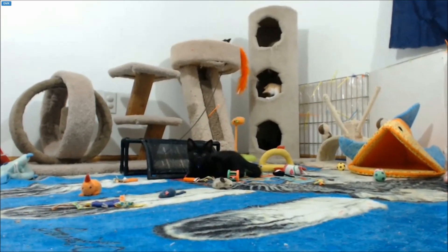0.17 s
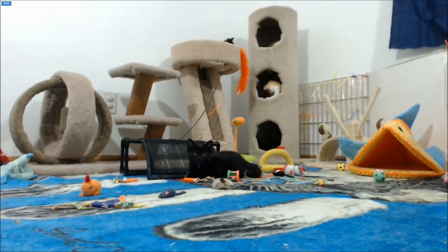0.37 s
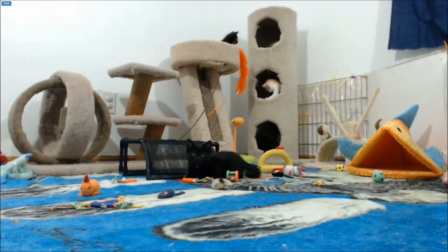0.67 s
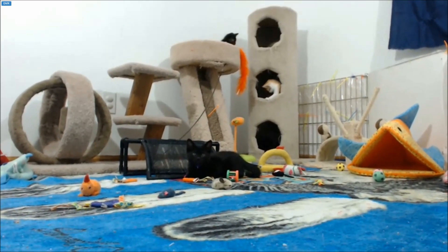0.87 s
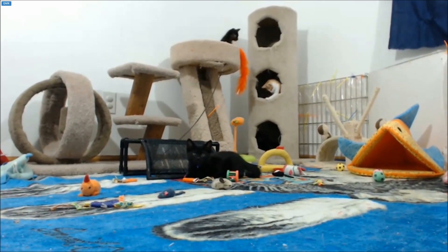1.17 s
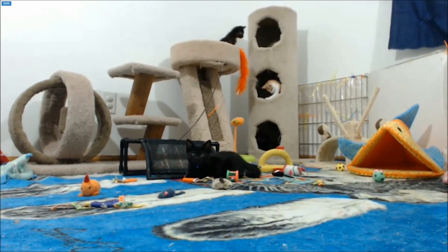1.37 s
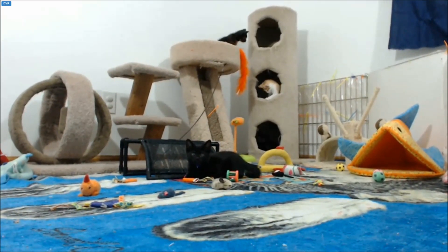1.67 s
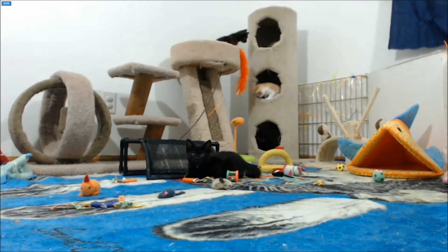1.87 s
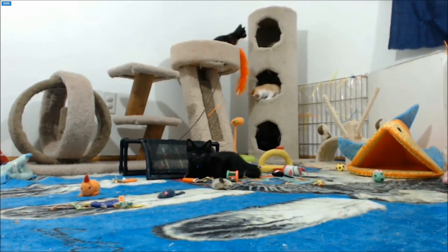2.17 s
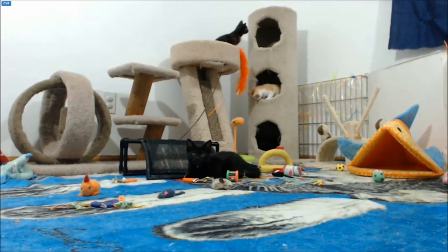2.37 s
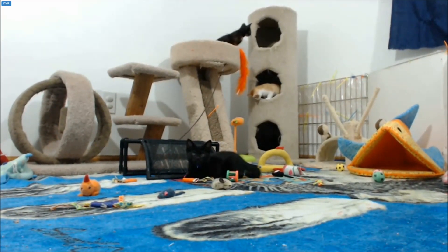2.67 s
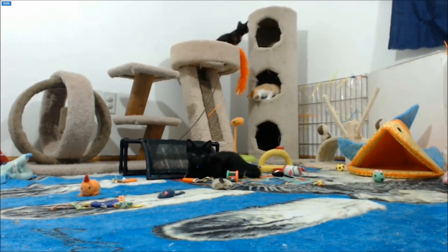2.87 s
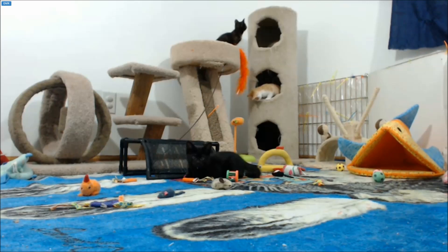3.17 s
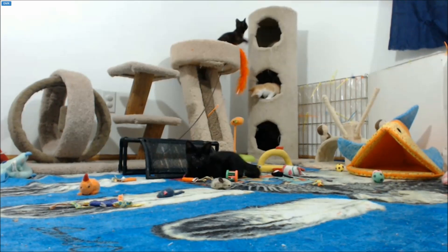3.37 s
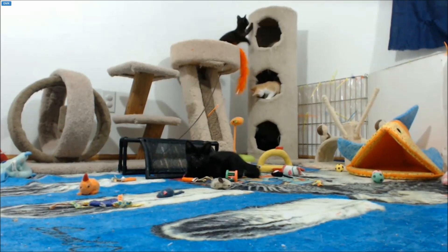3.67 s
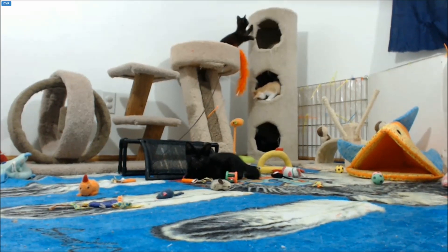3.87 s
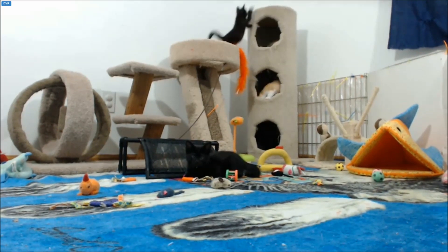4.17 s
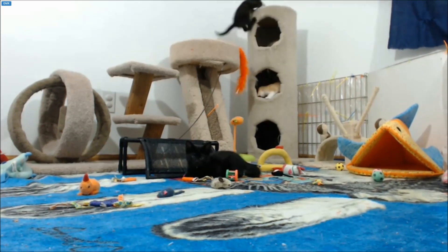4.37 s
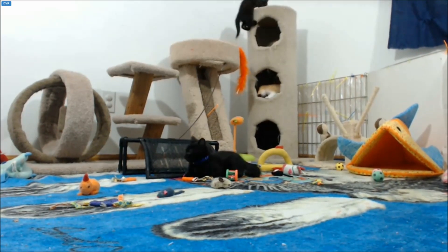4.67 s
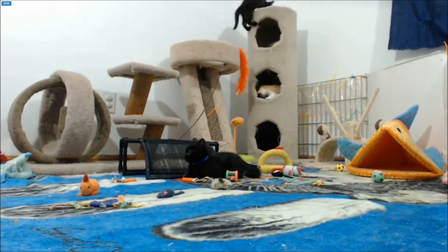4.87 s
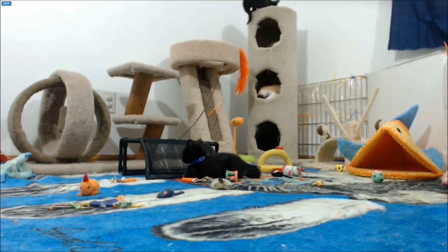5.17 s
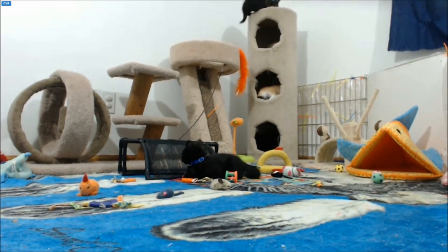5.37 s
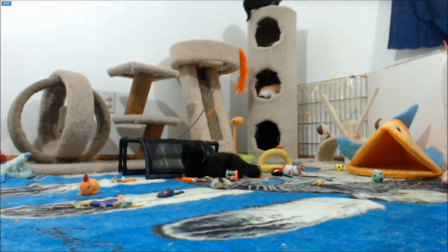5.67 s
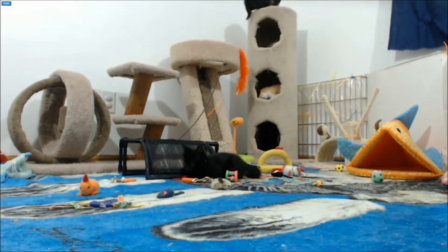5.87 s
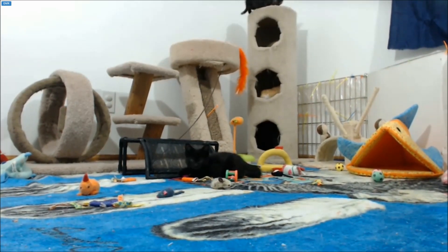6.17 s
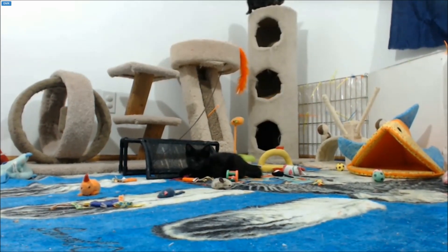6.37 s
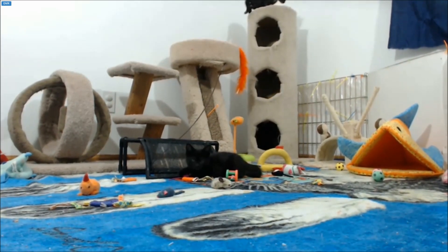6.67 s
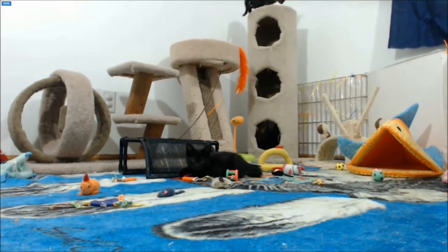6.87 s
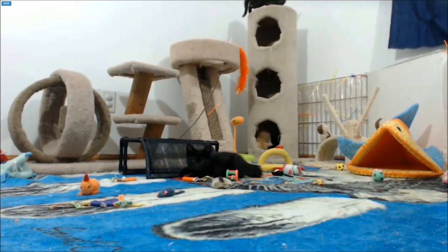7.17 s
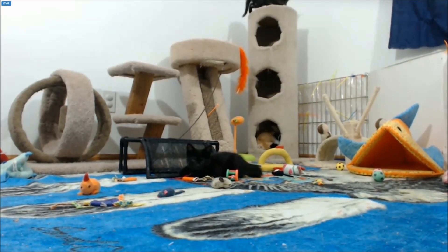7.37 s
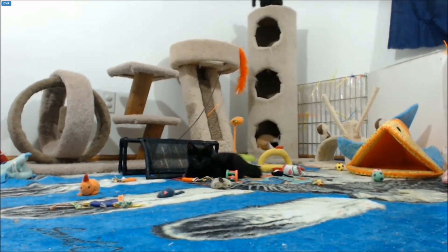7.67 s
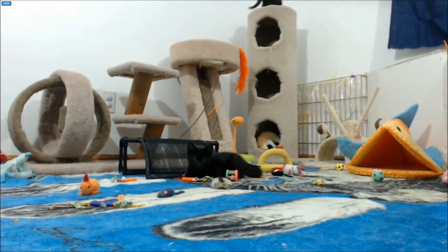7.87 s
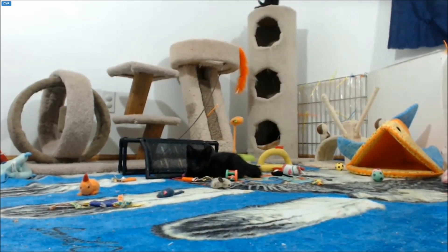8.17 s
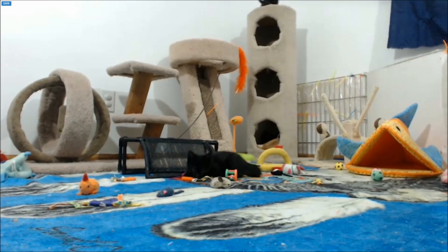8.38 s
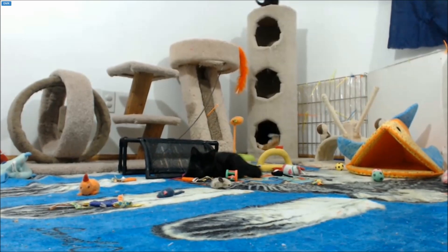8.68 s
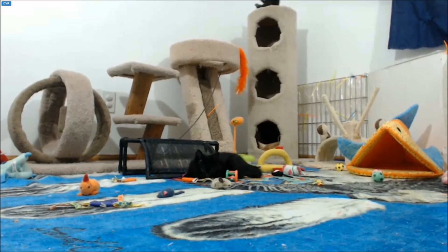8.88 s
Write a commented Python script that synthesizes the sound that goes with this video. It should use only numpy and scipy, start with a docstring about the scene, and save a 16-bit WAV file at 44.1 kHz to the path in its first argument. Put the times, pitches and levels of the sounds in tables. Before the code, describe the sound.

Small claws drag through carpet on a hollow climbing tower, beginning mid-scratch with raspy strokes and low tube resonance. Sharp snags and a brief thin slide follow, then lighter, sparser scrabbling with soft paw knocks. Scratching picks up again and grows into crisp, tearing catches and a dull thump near seven seconds, staying jerky to the end. Close stereo pickup in a small, soft, quiet room with faint air.

```python
"""Kittens' claws drag through the carpet of a hollow climbing tower and snap loose from its loops.
Bursts of noise, in strokes and sharp catches, make the pile, a board and the hollow tube ring together.
The scratching passes from the tube's inner wall to its outer wall; one claw tip slides down the inside.
Padded paws land with soft knocks made of decaying tones. A little room echo and faint, coloured
noise for the air surround it all."""
import sys
import numpy as np
from scipy import signal
from scipy.fft import rfft, irfft
from scipy.io import wavfile
from scipy.ndimage import uniform_filter1d

SR = 44100
rng = np.random.default_rng(int(sys.argv[2]) if len(sys.argv) > 2 else 0)


def inscribe(sig):
    """Save sig as 16-bit PCM at rate SR to the path in sys.argv[1].

    A 1-D sig is mono; a 2-D sig holds one channel per row.
    Samples are clipped to [-1, 1] before scaling.
    """
    pcm = np.round(np.clip(np.atleast_2d(sig).T, -1, 1) * 32767)
    wavfile.write(sys.argv[1], SR, pcm.astype(np.int16))


def convert_level_to_amplitude(level_db):
    """Map a level in decibels to its linear amplitude factor."""
    exponent = np.asarray(level_db, float) / 20
    return 10 ** exponent


N = 398223

# Claw strokes: start_s, end_s, pile_start_db, pile_end_db, weight_db (push on the tube over that on the pile)
CLAW_STROKES = [(0.0, 0.151, -47.5, -49.5, 6.5), (0.163, 0.393, -49.5, -53.5, 9.5),
                (0.474, 0.529, -81.5, -32.5, -4), (0.543, 0.584, -39, -60, -4.5),
                (0.621, 0.659, -44, -95, -32), (0.831, 0.953, -40, -70.5, 3.5),
                (0.944, 1.144, -43, -57.5, 13.5), (1.16, 1.348, -70, -77, 19.5),
                (1.596, 1.764, -48, -59.5, 6.5), (1.75, 1.885, -66, -47.5, 4),
                (1.898, 1.997, -46.5, -60, -0.5), (1.97, 2.061, -62, -75.5, 6),
                (2.326, 2.389, -81.5, -64.5, 8), (2.482, 2.517, -67, -71.5, 3.5),
                (2.618, 2.652, -77, -66.5, 9.5), (2.685, 2.769, -73.5, -68.5, 5.5),
                (3.066, 3.132, -70.5, -61, 19), (3.144, 3.205, -50.5, -81.5, 3.5),
                (3.203, 3.304, -60, -55, 6), (3.277, 3.382, -56.5, -66, -12),
                (3.388, 3.507, -50.5, -66, 10), (3.511, 3.585, -49, -69.5, 7.5),
                (3.635, 3.67, -78, -51.5, -10.5), (3.755, 3.825, -53, -95, 14.5),
                (3.812, 3.95, -74, -73.5, 1), (3.939, 3.999, -57.5, -47.5, 3),
                (4.007, 4.108, -59, -63.5, -28), (4.526, 4.595, -71.5, -52, -7),
                (4.681, 4.746, -43, -74, -7), (4.726, 4.81, -73.5, -40.5, 7),
                (4.807, 4.879, -54.5, -56, 9.5), (4.895, 4.966, -52.5, -64.5, 9),
                (5.025, 5.094, -59.5, -68, 12.5), (5.092, 5.186, -81, -44, 7.5),
                (5.199, 5.232, -49, -45.5, 7), (5.347, 5.436, -75.5, -40.5, 3.5),
                (5.443, 5.543, -53, -54.5, 3.5), (5.585, 5.657, -95.5, -94.5, 36),
                (5.799, 5.898, -59, -68, -8.5), (5.896, 5.944, -45, -62.5, -7),
                (6.261, 6.334, -44.5, -47, -44), (6.319, 6.378, -44.5, -49, -27),
                (6.38, 6.446, -61, -78, -34), (6.427, 6.512, -55.5, -50, -19.5),
                (6.496, 6.528, -46, -44.5, -26.5), (6.604, 6.644, -76, -55, -19),
                (6.645, 6.688, -42, -48, -24), (6.699, 6.811, -59, -57.5, -20),
                (6.84, 6.913, -62.5, -49, 4.5), (6.899, 6.982, -52, -41.5, -25),
                (7.028, 7.148, -49.5, -40.5, -2.5), (7.165, 7.199, -46, -52, 1), (7.202, 7.31, -61, -38, 3),
                (7.31, 7.356, -47, -94, -13.5), (7.443, 7.541, -43.5, -40.5, -7),
                (7.582, 7.677, -54.5, -43, -18.5), (7.66, 7.8, -56, -92, -9),
                (7.797, 7.912, -64, -40.5, -11.5), (7.903, 8.007, -52.5, -51, 2),
                (8, 8.091, -56.5, -47.5, -14.5), (8.023, 8.12, -80.5, -50, 6.5),
                (8.208, 8.293, -38, -53.5, -12), (8.32, 8.41, -52, -94, -4),
                (8.566, 8.647, -62, -45.5, -30), (8.645, 8.716, -40, -31, -21.5),
                (8.849, 8.878, -54.5, -62, -9), (8.949, 9.03, -79.5, -25.5, -4)]
# Tones of the hollow tube: pitch_hz, width_hz, relative_level_db
TUBE_TONES = [(123, 26, 2), (188, 45, -7), (246, 40, -2), (300, 40, 0), (385, 45, -4), (440, 50, -7)]
# Broad part of the sound of the shaken frame: pitch_hz, relative_level_db (per Hz)
FRAME_THUD = [(30, -51.5), (60, -27.5), (100, -4), (500, -5.5), (800, -21.5), (1400, -23)]


def rms_one(x):
    """Scale to unit rms, so that a later gain alone sets the level."""
    return x / np.sqrt(np.mean(x ** 2) + 1e-20)


def colour(x, points):
    """Filter with the given outline (pitch_hz, level_db); minimum phase, so it never sounds ahead of x."""
    size = 4096
    hz, db = np.transpose(points)
    log_hz = np.log(np.fft.rfftfreq(size, 1 / SR) + 1)
    log_gain = np.interp(log_hz, np.log(hz), db) * np.log(10) / 20
    # folding the cepstrum forward makes the filter minimum phase
    cepstrum = irfft(log_gain)
    cepstrum[1:size // 2] *= 2
    cepstrum[size // 2 + 1:] = 0
    response = irfft(np.exp(rfft(cepstrum)))
    return signal.fftconvolve(x, response)[:N]


def drift(rate_hz):
    """Slow random wander of unit rms: noise through two equal low-pass stages at rate_hz."""
    step = 40   # samples between points of the wander
    r = np.exp(-2 * np.pi * step * rate_hz / SR)
    noise = rng.standard_normal(N // step + 2002)
    slow = signal.lfilter([1], [1, -2 * r, r * r], noise)[2000:]   # drop the filter's run-in
    return np.interp(np.arange(N) / step, np.arange(len(slow)), rms_one(slow))


def air():
    """Faint air of the room: coloured noise whose level wanders."""
    outline = [(24, -73), (40, -22), (170, 2.5), (562, -12), (1020, -15.5), (3560, -22.5), (5500, -29.5),
               (12400, -30.5), (15500, -38)]   # pitch_hz, relative_level_db (per Hz)
    level_db = -82 + 2.5 * drift(10)
    return convert_level_to_amplitude(level_db) * rms_one(colour(rng.standard_normal(N), outline))


def echoes(t60_s):
    """Short diffuse return of a soft room: noise falling 60 dB in t60_s, of unit energy."""
    t = np.arange(8192) / SR
    tail = rng.standard_normal(len(t)) * convert_level_to_amplitude(-60 * t / t60_s) * (t > 0.002)
    return tail / np.sqrt(np.sum(tail ** 2))


def resonate(x, modes, place_db, tilt):
    """Parallel resonances; the moving claw drives each one now harder, now softer."""
    out = np.zeros(N)
    for k, (hz, width, db) in enumerate(modes):
        r = np.exp(-np.pi * width / SR)
        driven = x * convert_level_to_amplitude(db + place_db * drift(25) + tilt(hz)) + 1e-18
        poles = [1, -2 * r * np.cos(2 * np.pi * hz / SR), r * r]
        out += (-1) ** k * signal.lfilter([1 - r, 0, r - 1], poles, driven)
    return out


def paws():
    """Padded paws land softly; each landing rings the tube tones near its favoured pitch."""
    landings = [(0.55, -36, 198.5), (2.4, -55.5, 327), (2.501, -47.5, 309), (2.583, -59, 303),
                (2.638, -50.5, 276), (3.086, -45.5, 320), (3.864, -48.5, 150), (4.264, -46.5, 310),
                (4.693, -37, 328), (6.443, -37, 157), (7.084, -26.5, 154.6), (7.522, -37, 335),
                (7.538, -33.5, 263), (7.614, -40.5, 306)]   # time_s, peak_db, best_pitch_hz
    contact_s, reach_octaves = 0.0029, 0.24   # time constant of the soft rise; 6 dB weaker at this distance
    out = np.zeros(N + SR)
    u = np.arange(8192) / SR
    for s, peak_db, best_hz in landings:
        knock = np.zeros(len(u))
        for hz, width, _ in TUBE_TONES:
            strength = convert_level_to_amplitude(-6 * (np.log2(hz / best_hz) / reach_octaves) ** 2)
            tone = np.sin(2 * np.pi * hz * rng.uniform(1.0, 1.03) * u)
            knock += strength * tone * np.exp(-np.pi * width * u)
        knock *= 1 - np.exp(-u / contact_s)
        i = round(s * SR)
        out[i:i + len(u)] += convert_level_to_amplitude(peak_db) * knock / np.abs(knock).max()
    return out[:N]


def slide():
    """A claw tip slides down the inner wall; uneven skips over a thin rub ring its high resonances."""
    ring = [(3336, 110, -1), (5320, 150, 1.5), (10660, 410, -14)]   # pitch_hz, width_hz, relative_level_db
    start_s, end_s = 1.1, 1.365
    usual_skips_per_s, skip_s, rub = 62, 0.005, 0.29   # skip_s: time constant of each skip's fall
    turns = np.cumsum(usual_skips_per_s * convert_level_to_amplitude(1.2 * drift(38)) / SR)
    skips = (np.diff(np.floor(turns), prepend=0) > 0) * convert_level_to_amplitude(1.9 * drift(54))
    r = np.exp(-1 / (skip_s * SR))
    force = (rub + signal.lfilter([1], [1, -r], skips)) * rng.standard_normal(N)
    way = (np.arange(N) / SR - start_s) / (end_s - start_s)   # 0 to 1 along the slide
    touch = np.clip(np.minimum(way / 0.1, (1 - way) / 0.017), 0, 1)
    level_db = -57.5 - 13 * way.clip(0, 1)
    return touch * convert_level_to_amplitude(level_db) * rms_one(resonate(force, ring, place_db=4.5, tilt=lambda hz: 0))


def spot(s, axis):
    """Board level (axis 1), brightness (2) or bass (3) of the spot scratched at time s."""
    # time_s, board_over_pile_db, brightness_db_per_octave, tube_bass_db
    places = np.array([(0, -0.5, -2.5, -1), (0.95, -1, 0.8, 1), (1.17, -15, 5, -4), (1.6, 2.5, 0.5, 4),
                       (2.35, 9, -6, 3), (2.65, 4.5, -1.5, -21), (3.2, -2.5, -1, 0), (3.8, 0, -0.5, -4),
                       (4.05, -3, -2, -11), (4.5, -2, -2.5, -9), (5.05, 2, -0.5, -5), (5.48, 5, -0.3, -24),
                       (5.59, 12, 4, 2), (5.73, -2.5, -0.8, -22.5), (6.3, 11.5, -3.5, 0),
                       (7.3, -6, 0.5, -21), (8.0, -8.5, -0.5, -4), (8.3, 11, -3, -9.5), (9.0, -9, -0.5, 2)])
    return np.interp(s, places[:, 0], places[:, axis])


def brightness():
    """Spot and weight tilt each stroke's treble; the tilt holds until the next stroke starts."""
    starts, weights = np.array(CLAW_STROKES)[:, 0], np.array(CLAW_STROKES)[:, -1]
    tilts = spot(starts, axis=2) - 0.12 * weights   # dB per octave; a heavy stroke is duller
    current = (np.searchsorted(starts, np.arange(N) / SR) - 1).clip(0)
    return uniform_filter1d(tilts[current], size=300)


def lean():
    """Gain of the pile in dB at a pitch: the stroke's tilt plus the ring favoured under the claw."""
    # The patch of pile rings best near one pitch until the claw moves on: time_s, pitch_hz
    s, best_hz = np.transpose([(0, 5670), (0.45, 3920), (0.799, 3370), (2.45, 1470), (2.6, 3890),
                               (4.5, 1370), (4.73, 1930), (5.7, 3740), (6.25, 4550), (6.31, 1970),
                               (8.36, 3570), (8.64, 1960)])
    tilt = brightness()
    row = (np.searchsorted(s, np.arange(N) / SR) - 1.0).clip(0)
    row = uniform_filter1d(row, size=200)

    def gain_db(hz):
        octaves_away = np.log2(hz / best_hz)
        favour_db = 6 * np.exp(-(octaves_away / 0.16) ** 2)
        return tilt * np.log2(hz / 3500) + np.interp(row, np.arange(len(s)), favour_db)

    return gain_db


def patches(x, place_db, tilt):
    """Half-octave bands that swell and shrink on their own and follow the given tilt."""
    out = np.zeros(N)
    edges = 1000 * 2.0 ** np.arange(-5, 4.5, 0.5)
    for low, high in zip(edges, edges[1:]):
        band_pass = signal.butter(2, [low, high], "band", fs=SR, output="sos")
        band = signal.sosfilt(band_pass, x + 1e-18)
        out += band * convert_level_to_amplitude(0.55 * place_db * drift(21) + tilt(np.sqrt(low * high)))
    return out


def body(force, modes, broad, broad_db, place_db, tilt=lambda hz: 0):
    """A part rings in its modes plus a broad band; scaled by the power unit noise would get, unwandered."""
    power = convert_level_to_amplitude(2 * broad_db) * np.sum(colour(signal.unit_impulse(4096), broad) ** 2)
    rings = np.zeros(N)
    for table, share in modes:
        for hz, width, db in table:
            power += 2 * np.pi / SR * np.mean(share ** 2) * width * convert_level_to_amplitude(2 * db)
        rings += share * resonate(force, table, place_db, tilt)
    hiss = convert_level_to_amplitude(broad_db) * patches(colour(force, broad), place_db, tilt)
    return (rings + hiss) / np.sqrt(power)


def snaps(usual_per_s, spread_db, rub):
    """Loops of pile let go in clumps, over a steady rub of fibres; unit rms."""
    sizes = convert_level_to_amplitude(spread_db * np.minimum(rng.exponential(1, N), 5)) * rng.choice([-1, 1], N)
    born = rng.random(N) < usual_per_s * convert_level_to_amplitude(5 * drift(40)) / SR
    return rms_one(rms_one(sizes * born) + rub * rng.standard_normal(N))


def drag(part, taper_s):
    """Force of the strokes on a part (0 pile, 1 board, 2 tube): a ramp in dB with rounded ends."""
    power = np.zeros(N)
    for start, end, first_db, last_db, weight_db in CLAW_STROKES:
        i, j = round(start * SR), min(round(end * SR + taper_s * SR), N)
        ends = signal.windows.tukey(j - i, min(2 * taper_s * SR / (j - i), 1))
        if i == 0:   # already under way
            ends[:(j - i) // 2] = 1
        board_db = spot(start, axis=1) + 0.57 * weight_db   # more weight shakes the board more too
        level_db = np.linspace(first_db, last_db, j - i) + [0, board_db, weight_db][part]
        power[i:j] += (ends * convert_level_to_amplitude(level_db)) ** 2
    return np.sqrt(power)


def jolts(part, rise_s, fall_s, catch_db):
    """Force of the catches on a part: a claw loads a loop briefly and slips off."""
    # time_s, pile_level_db, weight_db (push on the tube over that on the pile)
    s, pile_db, weight_db = np.transpose([(0.838, -37.5, 5), (0.9556, -28.5, 2), (0.966, -25, 7),
                                          (1.0036, -31, 4.5), (1.061, -28, 5), (1.614, -64, 11),
                                          (1.6488, -27, -2.5), (1.9035, -27.5, -2.5), (1.938, -26, 2.5),
                                          (2.1111, -54.5, -48), (2.3842, -47, -16), (2.5046, -55.5, -3),
                                          (2.7292, -46, -21), (2.927, -62, -56.5), (3.397, -38.5, -14),
                                          (3.5143, -38.5, 8.5), (3.5592, -39, 11), (3.577, -39.5, -10),
                                          (3.6701, -44.5, -6), (3.981, -32, 0), (4.078, -40.5, -82),
                                          (4.192, -45.5, -47.5), (4.26, -34, -21), (4.3024, -38, -46),
                                          (4.316, -40, -38), (4.382, -57.5, -40), (4.5127, -50.5, -21),
                                          (4.5312, -38, -20), (4.579, -38, -23), (4.6406, -37.5, -4),
                                          (4.6966, -35, -33), (4.776, -38, -5), (4.8298, -30.5, -40),
                                          (4.924, -34.5, 6), (5.0064, -52.5, 19.5), (5.042, -40.5, -36),
                                          (5.1386, -34, 9), (5.1798, -35.5, 6), (5.423, -37.5, 2),
                                          (5.749, -38, -41), (5.871, -38, -38), (5.883, -36.5, 2),
                                          (6.087, -47.5, -10), (6.22, -42.5, -13.5), (6.2586, -28, -79),
                                          (6.287, -34, -49), (6.735, -38.5, -92), (6.799, -40.5, -7),
                                          (6.9333, -34.5, -0.5), (6.9696, -30, 0.5), (7.047, -26.5, 5),
                                          (7.072, -37, -16.5), (7.0821, -24.5, 4.5), (7.2724, -26.5, -6),
                                          (7.315, -21.5, -58), (7.3296, -28, -2), (7.3495, -19, -23),
                                          (7.3714, -23.5, -19), (7.4021, -31.5, -7), (7.43, -19.5, -18),
                                          (7.616, -35, -2), (8.0165, -26.5, -61), (8.2209, -22, -13.5),
                                          (8.2471, -25.5, -8.5),  (8.331, -39.5, -26), (8.369, -40, -31),
                                          (8.379, -36.5, -58), (8.413, -40, -13), (8.4819, -36.5, -23),
                                          (8.7541, -25.5, -0.5)])
    board_db = 0.28 * spot(s, axis=1) + 0.25 * weight_db
    at = np.zeros(N)
    at[np.round(s * SR).astype(int)] = convert_level_to_amplitude(pile_db + [0, board_db, weight_db][part] + catch_db)
    u = np.arange(4096) / SR
    shape = (1 - np.exp(-u / rise_s)) ** 2 * np.exp(-u / fall_s)
    return signal.fftconvolve(at, shape / shape.max())[:N].clip(0)


def tube(coarse, torn):
    """Strokes and shoves ring the hollow tube; carpet muffles its treble, the spot sets its bass."""
    shove = jolts(part=2, rise_s=0.00036, fall_s=0.00021, catch_db=7) * (0.16 + 1.12 * torn)
    force = drag(part=2, taper_s=0.013) * coarse + shove
    ringing = body(force, [(TUBE_TONES, np.ones(1))], FRAME_THUD, broad_db=-3.5, place_db=2.8)
    ringing = signal.sosfilt(signal.butter(2, 800, fs=SR, output="sos"), ringing)
    # split at 245 Hz; each filter runs twice so that the halves add up evenly
    low_pass = signal.butter(2, 245, "low", fs=SR, output="sos")
    high_pass = signal.butter(2, 245, "high", fs=SR, output="sos")
    bass = signal.sosfilt(np.tile(low_pass, (2, 1)), ringing)
    upper = signal.sosfilt(np.tile(high_pass, (2, 1)), ringing)
    return upper + bass * convert_level_to_amplitude(spot(np.arange(N) / SR, axis=3))


def board(coarse, torn):
    """Each pull shakes a board, which rings in a few tones; carpet muffles its treble."""
    tones = [(725, 60, 0), (485, 60, -10), (1250, 90, -16)]   # pitch_hz, width_hz, relative_level_db
    force = drag(part=1, taper_s=0.014) * coarse
    force += jolts(part=1, rise_s=0.0014, fall_s=0.003, catch_db=-4) * torn
    ringing = body(force, [(tones, np.ones(1))], FRAME_THUD, broad_db=-10, place_db=4.5)
    return signal.sosfilt(signal.butter(4, 1500, fs=SR, output="sos"), ringing)


def pile(fine, torn, outside):
    """Snapping loops hiss and ring the carpet, whose tones pass from the inner to the outer wall."""
    # Tones of the carpet on each wall: pitch_hz, width_hz, relative_level_db
    inner_tones = [(1440, 90, -2), (1780, 100, -3), (2600, 100, -6), (3300, 250, -5), (4230, 110, -5),
                   (5250, 400, -3), (10800, 450, -13)]
    outer_tones = [(1450, 70, -9), (1780, 130, 0), (1960, 130, -1), (2280, 120, -4), (3520, 200, -5.5),
                   (3800, 150, -6), (4250, 130, -7), (4640, 300, -10)]
    # Broad part of a snapping loop: pitch_hz, relative_level_db (per Hz)
    loop_hiss = [(800, -36.5), (1300, 6), (2500, 8.5), (5000, 6.5), (8000, -2.5), (12500, -6.5),
                 (15500, -40)]
    force = drag(part=0, taper_s=0.016) * fine
    force += jolts(part=0, rise_s=0.00071, fall_s=0.0036, catch_db=-5) * torn
    walls = [(inner_tones, np.sqrt(1 - outside)), (outer_tones, np.sqrt(outside))]
    return body(force, walls, loop_hiss, broad_db=-8.5, place_db=2.8, tilt=lean())


def tower():
    """The same snaps reach pile, board and tube; a catch tears many fibres at once and shoves the frame."""
    # Passage of the scratching from the inner to the outer wall: start_s, end_s
    moves_out_s = (1.66, 2.4)
    outside = np.interp(np.arange(N) / SR, moves_out_s, [0, 1])
    grip = convert_level_to_amplitude((3.2 - 1.3 * outside) * drift(70))   # the pull is jerky, less so on the outer wall
    # the outer carpet is denser and smoother, so it rubs more
    fine = grip * snaps(3000, spread_db=4, rub=0.62 + 0.19 * outside)
    coarse = rms_one(fine + 0.84 * snaps(400, spread_db=4.5, rub=1))
    torn = snaps(5700, spread_db=0, rub=13)
    scratching = pile(fine, torn, outside) + board(coarse, torn) + tube(coarse, torn)
    return scratching + slide() + paws()


def scene():
    """The tower near the middle, a little room, faint air; two close ports differ slightly."""
    width = [(60, -30), (300, -36), (1100, -16.5), (2400, -30.5), (3600, -23), (15000, -24.5)]   # pitch_hz, side_over_mid_db
    claws = tower()
    mid = claws + convert_level_to_amplitude(-15) * signal.fftconvolve(claws, echoes(0.15))[:N]
    mid += air()
    side = colour(signal.fftconvolve(mid, echoes(0.024))[:N], width)
    return np.array([mid + side, mid - side])


def top_cut(x):
    """Nothing passes above the cut-off."""
    return signal.sosfilt(signal.butter(12, 15660, fs=SR, output="sos"), x)


def record(dry):
    """The microphone loses the lowest bass (below 65 Hz) and the top (above 13.6 kHz)."""
    no_rumble = signal.sosfilt(signal.butter(3, 65, "high", fs=SR, output="sos"), dry)
    dull = signal.sosfilt(signal.butter(6, 13600, fs=SR, output="sos"), no_rumble)
    return top_cut(dull)


dry = scene()
out = record(dry)
inscribe(out)
```